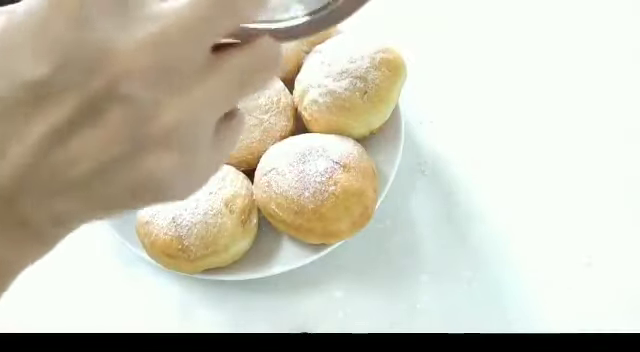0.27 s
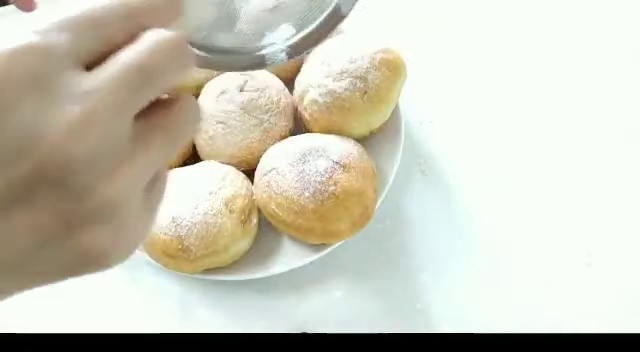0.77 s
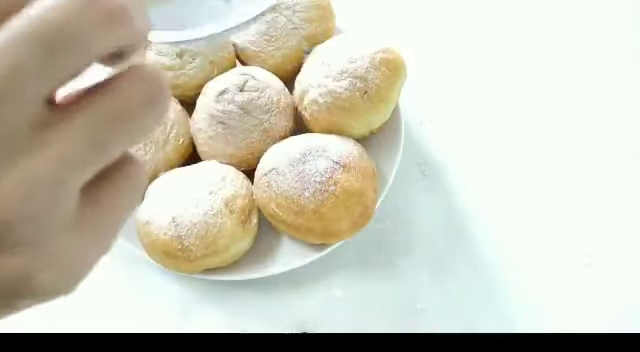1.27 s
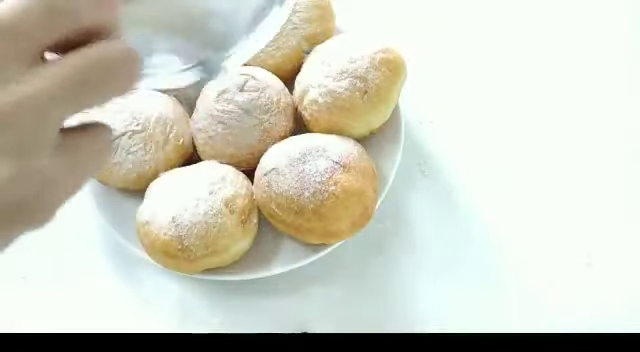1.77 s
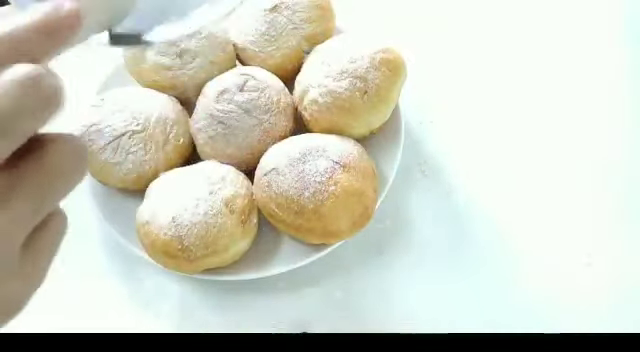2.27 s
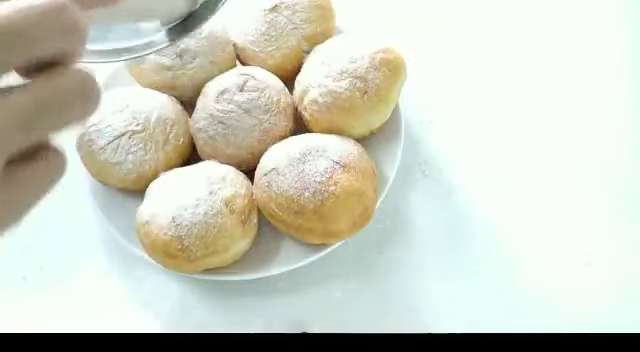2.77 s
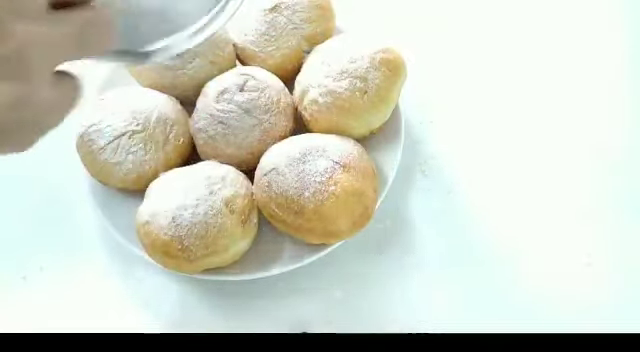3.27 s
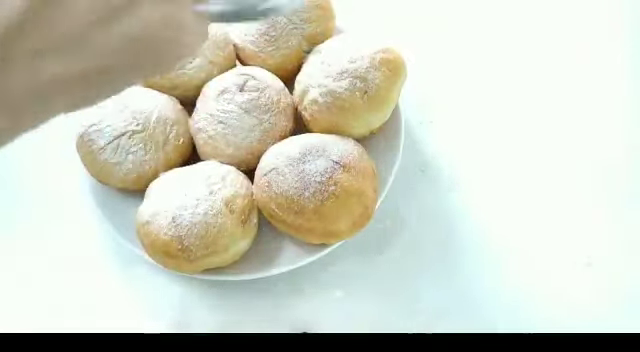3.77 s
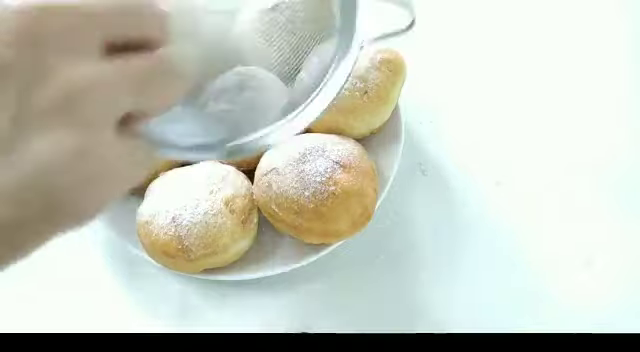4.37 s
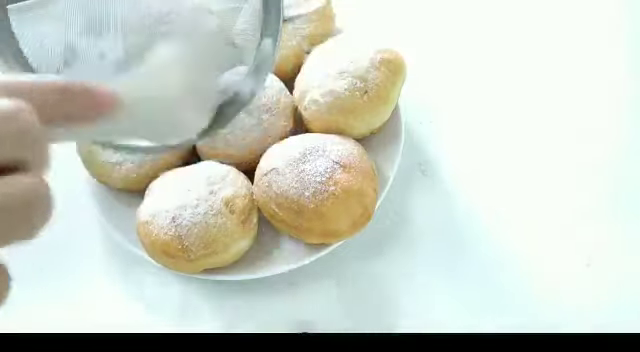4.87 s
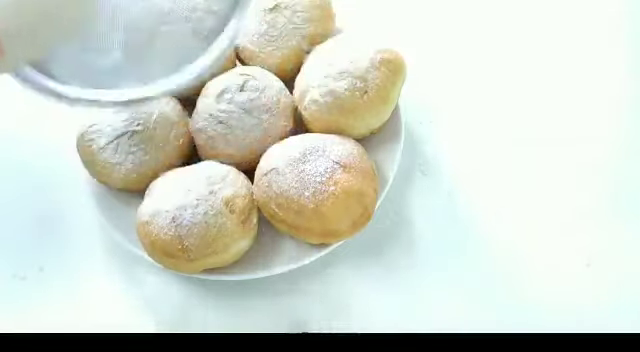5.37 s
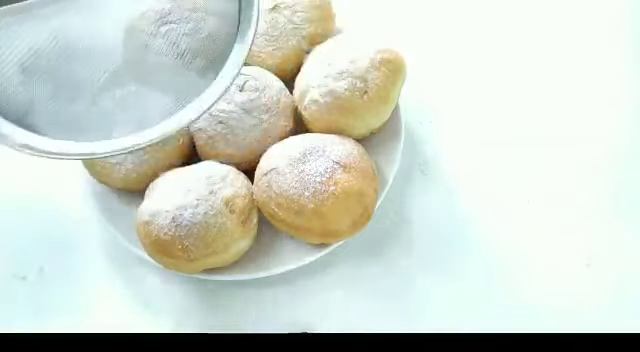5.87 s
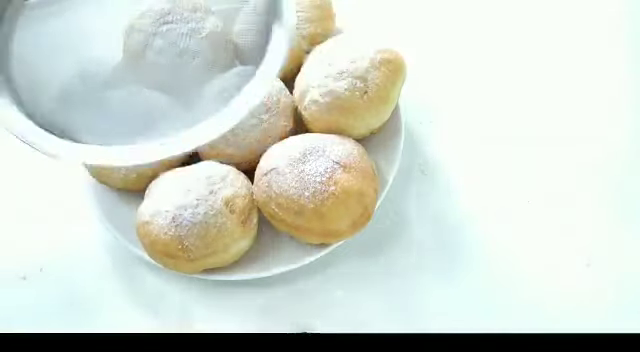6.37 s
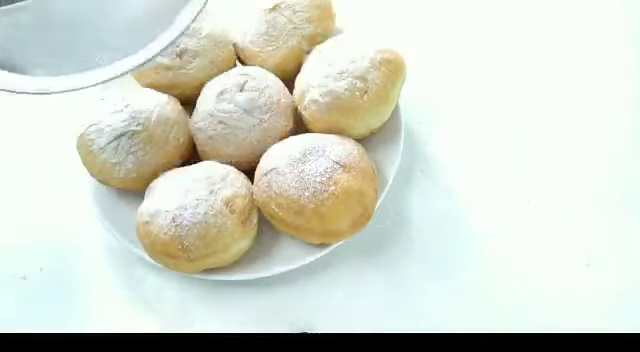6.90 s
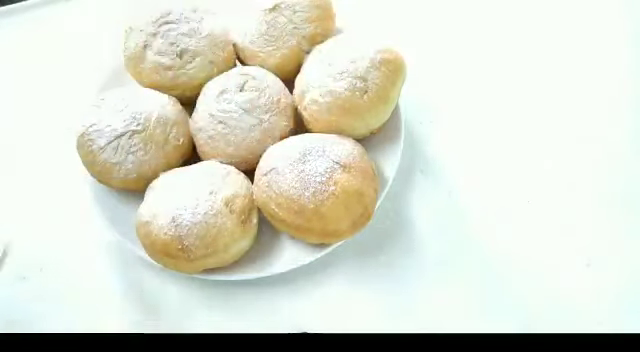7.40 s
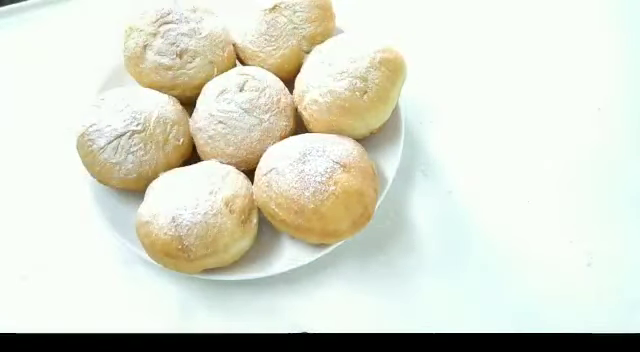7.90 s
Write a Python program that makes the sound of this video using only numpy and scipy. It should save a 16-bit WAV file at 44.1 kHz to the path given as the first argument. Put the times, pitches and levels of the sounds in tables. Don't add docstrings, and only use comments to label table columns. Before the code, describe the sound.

Fingers tap and shake a metal mesh sieve of sugar, sharp rim cracks and grainy swishes close up over a low kitchen hum.

```python
import sys
import numpy as np
from scipy import signal
from scipy.fft import rfft, irfft, next_fast_len
from scipy.io import wavfile
from scipy.ndimage import uniform_filter1d

SR = 44100
rng = np.random.default_rng(int(sys.argv[2]) if len(sys.argv) > 2 else 0)


def boost(x):
    u = np.asarray(x, float) / 20
    return 10 ** u


def store_pcm(level_fs):
    pcm = np.round(np.clip(level_fs, -1, 1) * 32767).astype(np.int16)
    wavfile.write(sys.argv[1], SR, np.atleast_2d(pcm).T)


N = 358959

# frequency in Hz, level in dB per Hz.
HUM_SPECTRUM = [(18, -65), (30, -38), (53, -39), (112, -20), (227, -1.5), (280, -6.5), (404, -1.5),
                (600, -10.5), (889, -12), (1220, -13), (1760, -15.5), (2290, -13), (5900, -24), (6720, -22),
                (16000, -29)]
# frequency in Hz, width in Hz, height in dB.
HUM_TONES = [(180, 20, 3), (365, 15, 3), (254, 14, 4.5), (416, 12, 5.5), (556.2, 13, 9.5), (595, 12, 10),
             (641, 12, 3.5), (725, 4.7, 1), (1087, 19, 5), (1206, 16, 6.5)]
# frequency in Hz, likeness left to right (1 = same).
HUM_LIKENESS = [(60, 1), (130, 0.96), (290, 0.81), (640, 0.57), (1410, -0.1), (3100, 0), (6820, 0),
                (15000, 0.1)]
# time in seconds, level in dB.
HUM_LEVEL = [(0.0, -42), (0.9, -41), (1.7, -39.3), (2.7, -36.8), (4.4, -35.6), (5.2, -37.3), (5.58, -33.5),
             (5.96, -36), (6.89, -34.8), (8.14, -35.4)]
# fastest slide in seconds, level in dB, rise in seconds.
SLIDES = [(0.018, -27.5, 0.037), (0.191, -24.5, 0.022), (0.398, -26.5, 0.024), (0.587, -28.5, 0.016),
          (0.872, -20.5, 0.0054), (1.552, -28, 0.043), (1.756, -26, 0.024), (1.945, -24, 0.026),
          (2.699, -20, 0.0098), (2.82, -23, 0.01), (2.911, -24.5, 0.003), (3.091, -19, 0.013),
          (3.294, -21.5, 0.02), (3.477, -21, 0.012), (3.59, -25, 0.005), (3.657, -22, 0.015),
          (3.753, -17, 0.0063), (3.846, -22, 0.031), (3.941, -16.5, 0.013), (4.037, -21, 0.019),
          (4.123, -17, 0.0049), (4.232, -23.5, 0.043), (4.336, -18, 0.003), (4.422, -24.5, 0.041),
          (4.632, -23, 0.014), (4.807, -25.5, 0.031), (5.013, -24.5, 0.028), (5.187, -20.5, 0.003),
          (5.212, -20, 0.012), (5.56, -31, 0.053), (5.715, -27.5, 0.018)]
# peak in seconds, level in dB, rise in
# seconds, fall in seconds.
TRICKLES = [(0.836, -30, 0.002, 0.009), (0.72, -46, 0.06, 0.1), (1.0, -47, 0.04, 0.08),
            (1.15, -45, 0.06, 0.1), (1.32, -44, 0.04, 0.06), (2.03, -41, 0.03, 0.08),
            (5.33, -41, 0.03, 0.1), (5.14, -32, 0.01, 0.04), (2.66, -36, .02, .02), (2.79, -32, .01, .02),
            (3.03, -31, .01, .02), (5.525, -30, .006, .03),  (2.217, -31.5, 0.012, 0.075),
            (2.4, -31, 0.017, 0.08), (2.57, -31, 0.025, 0.12), (4.76, -32, .01, .03), (4.95, -33, .01, .03),
            (8.06, -33, .03, .03), (3.42, -30, .01, .03), (5.94, -46, 0.016, 0.17),
            (6.6, -33, 0.022, 0.051), (7.13, -44, 0.1, 0.1), (7.336, -35.5, 0.026, 0.027),
            (7.483, -40, 0.022, 0.054), (7.655, -23, 0.025, 0.035), (7.735, -33, 0.03, 0.04),
            (7.812, -27, 0.03, 0.04), (7.9, -29, 0.05, 0.045), (8.015, -31, 0.02, 0.03),
            (8.118, -30.5, 0.05, 0.2)]
# start in seconds, crack peak in dB, dull part in dB, thrown sugar in dB.
TAPS = [(0.1335, -14, -5, -33), (0.3087, -13, -24, -20), (0.37, -14, -16, -22), (0.5148, -12, 5, -32),
        (0.5696, -8, -20, -21), (0.859, -12, -19, -24), (1.4486, -3, -18, -26.5), (1.6632, -3.5, 6, -26),
        (1.7252, -13, -18, -27), (1.8688, -4, -26, -22), (2.1951, -2, -18, -22), (2.1972, -4, -20, -24),
        (2.3597, -1, -27, -22), (2.5247, -3, -26, -23), (2.8964, -9, -14, -19.5), (3.0074, -11, -22, -19.5),
        (3.1993, -19, -28, -17.5), (3.392, -11, -10, -17.5), (3.579, -4, -26, -21), (3.591, -7, -20, -24),
        (3.732, -13, -18.5, -23), (4.3242, -8, -24, -19), (4.3337, -4, -22, -25), (4.5472, -10, -30, -24),
        (4.6123, -9, -23, -21.5), (4.6159, -2.5, -18, -26), (4.734, 0, -12, -23), (4.7885, -10, -22, -25),
        (4.9233, 0, -28, -25), (4.9868, -11, -29, -26), (5.1136, -2.5, -9, -22), (5.5075, -1.5, -24, -22),
        (5.5105, -4, -22, -26), (5.671, -2.5, -25, -24), (5.673, -6, -26, -28), (8.035, -12, -7, -27.5)]
# frequency in Hz, level in dB per Hz.
SUGAR_SPECTRUM = [(500, -39), (1000, -10), (1700, -13.5), (2500, -6.5), (3300, -5.5), (4200, -6),
                  (6000, -6.5), (6750, -8), (7200, -5.5), (8500, -4), (12000, -3), (15000, 0), (16500, -22)]
# frequency in Hz, width in Hz, height in dB.
MESH_MODES = [(2170, 340, 4.5), (3730, 130, 1.5), (4710, 100, -1), (5980, 470, 6), (7405, 390, 5),
              (8444, 350, 9), (9940, 1240, 5.5), (11680, 880, 5.5), (13200, 270, -0.5), (3240, 130, -1.5),
              (9000, 170, 0)]
# frequency in Hz, level in dB, T60 in seconds.
HOOP_MODES = [(1070, -6, .03), (1450, -3, .012), (2270, 2, .022), (3740, 0, .008), (4770, -1, .012)]
# time in seconds, left minus right in dB.
SIEVE_PAN = [(0, -2.2), (1.9, -2.1), (2.2, -0.4), (2.6, -3), (3.3, -0.8), (4.1, -3), (4.85, 0.8),
             (5.3, -0.8), (8.14, -1.6)]
# centre in seconds, half length in seconds, frequency in Hz, level in dB.
DRONES = [
    (1.03, .1, 183, -47),
    (1.04, .12, 258, -44),
    (1.54, .13, 182, -45),
    (1.62, .22, 250, -43),
    (1.5, .13, 367, -44),
    (1.62, .1, 345, -47),
    (2.03, .17, 365, -44),
    (2.02, .15, 210, -46),
]
# start in seconds, depth in dB.
DIPS = [
    (2.194, 7.5),
    (2.359, 15),
    (2.523, 12),
    (4.733, 11),
    (4.923, 6),
    (5.113, 4),
    (5.507, 13),
    (5.670, 9),
]
# frequency in Hz, level in dB, T60 in seconds.
RIM_MODES = [(4800, -43, 0.22), (5950, -40, .3), (7440, -30.5, 0.6), (7730, -36, 0.4), (8370, -38, 0.3),
             (10200, -36, 0.4), (11710, -29, .5), (12880, -38, .3), (14690, -39, .3)]
# start in seconds, peak in dB, frequency in Hz.
KNOCKS = [
    (3.48, -35, 1270),
    (3.666, -34, 997),
    (3.836, -30, 1154),
    (3.957, -44, 1010),
    (4.021, -33, 997),
]
# frequency in Hz, left minus right in dB.
PORT_COLOUR = [(60, 0), (120, -2), (250, 1), (500, 0.5), (2000, 0), (4400, -0.4), (8000, -2), (15000, 3.5)]
# frequency in Hz, width in Hz, height in dB.
CASE_NOTCHES = [(6750, 300, -3), (9150, 250, -2), (11000, 300, -2)]


def interp_log(hz, points):
    points = np.array(points)
    return np.interp(np.log(hz), np.log(points[:, 0]), points[:, 1])


def gain(points, peaks, size):
    hz = np.arange(size // 2 + 1) * SR / size + 1
    db = interp_log(hz, points)
    db = db + sum(up / (1 + (2 * (hz - f) / width) ** 2) for f, width, up in peaks)
    cepstrum = irfft(np.log(boost(db)), size)
    cepstrum[1:size // 2] *= 2
    cepstrum[size // 2 + 1:] = 0
    return irfft(np.exp(rfft(cepstrum)), size)[:size // 2]


def through(x, response):
    return signal.oaconvolve(x, np.atleast_2d(response), axes=1)[:, :x.shape[1]]


def split(x):
    edge_hz = 4580
    low = signal.sosfilt(signal.butter(2, edge_hz, "low", fs=SR, output="sos"), x)
    high = signal.sosfilt(signal.butter(2, edge_hz, "high", fs=SR, output="sos"), x)
    return low, -high


def unit(x):
    return x / np.sqrt(np.mean(x ** 2))


def walk(rate_hz):
    hold = int(SR / rate_hz)
    steps = np.repeat(rng.standard_normal(N // hold + 1), hold)
    return 1.3 * uniform_filter1d(uniform_filter1d(steps, hold), hold)[:N]


def patchy(x, depth_db, long, size):
    z = signal.stft(x, nperseg=size)[2]
    field = rng.standard_normal(z.shape)
    field = uniform_filter1d(field + field[0], 2, axis=1)
    field = uniform_filter1d(field, long, axis=2)
    return unit(signal.istft(z * boost(depth_db * unit(field)), nperseg=size)[1][:, :N])


def sides(pan_db):
    return boost(np.array([[pan_db], [-pan_db]]) / 2)


def place(s):
    return np.interp(s, *np.transpose(SIEVE_PAN))


def dip_db(t):
    close_s, open_s = 0.011, 0.036
    total_db = 0
    for s, depth_db in DIPS:
        since = np.clip(t - s, 0, 2)
        total_db = total_db - 3.03 * depth_db * (np.exp(-since / open_s) - np.exp(-since / close_s))
    return total_db


def hum(t):
    size = next_fast_len(N)
    hz = np.arange(size // 2 + 1) * SR / size + 1
    alike = interp_log(hz, HUM_LIKENESS).clip(-.9, .99)
    mid = irfft(rfft(rng.standard_normal(N), size) * np.sqrt(1 + alike), size)[:N]
    side = irfft(rfft(rng.standard_normal(N), size) * np.sqrt(1 - alike), size)[:N]
    air = unit(through(np.array([mid + side, mid - side]), gain(HUM_SPECTRUM, HUM_TONES, size=16384)))
    air = patchy(air, depth_db=2.0, long=9, size=4096)
    level_db = np.interp(t, *np.transpose(HUM_LEVEL)) + 0.35 * walk(6.8)
    return air * boost(level_db + dip_db(t) + 3.5)


def hiss():
    shape = [(1500, -10), (4000, -10.5), (8000, 2), (16000, -7)]  # Hz, dB
    air = through(rng.standard_normal((2, N)), gain(shape, [], size=1024))
    return patchy(air, depth_db=3.5, long=4, size=1024) * boost(-49.3)


def grains(per_s, spread_db, smear_s):
    sizes = (rng.random(N) < per_s / SR) * boost(spread_db * rng.exponential(size=N))
    tail = np.exp(-np.arange(128) / (smear_s * SR))
    power = through(sizes[None] ** 2, tail).clip(0)
    return unit(np.sqrt(power) * rng.standard_normal((2, N)))


def sugar_power(t):
    bright, dull = np.zeros((2, N)), np.zeros((2, N))
    strokes = [(s, db, rise_s, 0.023 + 0.3 * rise_s) for s, db, rise_s in SLIDES]
    for s, db, rise_s, fall_s in strokes + TRICKLES:
        near = slice(max(int((s - 6 * rise_s) * SR), 0), int((s + 6 * fall_s) * SR))
        u = np.clip((t[near] - s) / np.where(t[near] < s, rise_s, fall_s), -20, 20)
        power = (boost(db) * sides(place(s)) / np.cosh(u)) ** 2
        dull_db = -0.9 - 0.6 * (db + 25)
        bright[:, near] += power
        dull[:, near] += power * boost(2 * dull_db)
    for s, crack_db, _, db in TAPS:
        after = slice(int(s * SR), int((s + .15) * SR))
        fall_s = max(0.012 - 0.0003 * crack_db, .005)
        power = (boost(db) * sides(place(s)) * np.exp(-(t[after] - s) / fall_s)) ** 2
        bright[:, after] += power
        dull[:, after] += power * boost(2 * -2.5)
    return bright, dull


def sugar(t):
    bright, dull = sugar_power(t)
    spray = grains(per_s=6000, spread_db=1.6, smear_s=0.00045)
    spray = unit(through(spray, gain(SUGAR_SPECTRUM, MESH_MODES, size=4096)))
    spray = patchy(spray, depth_db=4.0, long=6, size=1024)
    low, high = split(spray * boost(0.65 * walk(70)))
    thin_db = sum(-0.5 * db * (t > s) * np.exp(-abs(t - s) / 0.2) for s, db in DIPS)
    low_gain = boost(0.45 * dip_db(t) + thin_db)
    return boost(1.1) * (np.sqrt(dull) * low * low_gain + np.sqrt(bright) * high)


def rim_taps():
    out, t = np.zeros((2, N + 1024)), np.arange(1024) / SR
    shape = [(500, -36.5), (1500, 8.5), (3000, 12), (12000, 15), (16000, 4)]  # Hz, dB
    blow, ring = gain(shape, [], size=2048), gain(shape, MESH_MODES[:9], size=1024)
    chance = rng.standard_normal((len(TAPS), 3, 1024))
    for (s, db, dull_db, _), (both, left, right) in zip(TAPS, chance):
        rattle = (.6 * both + np.array([left, right])) * np.exp(-t / .003)
        rattle = unit(through(rattle, ring)) + .75 * np.sign(both[0]) * unit(blow)
        low, high = split(rattle)
        body = 0
        for k, (hz, mode_db, t60_s) in enumerate(HOOP_MODES):
            envelope = boost(mode_db + 2.2 * left[k] - 60 * t / t60_s) * (1 - np.exp(-t / .0004))
            body = body + envelope * np.sin(2 * np.pi * hz * (1 + .025 * both[k + 1]) * t)
        crack = boost(dull_db + 14) * (low + body) + high
        crack = crack / np.max(np.abs(crack.mean(axis=0)))
        i = int((s - .0004) * SR)
        out[:, i:i + 1024] += boost(db - 3.1) * sides(2.2 * place(s)) * crack
    return out[:, :N]


def drones(t):
    out = 0
    for s, long_s, hz, db in DRONES:
        out = out + boost(db) * np.exp(-((t - s) / long_s) ** 4) * np.sin(2 * np.pi * hz * t)
    return out


def rim_ring():
    out, t = np.zeros((2, N)), np.arange(SR // 2) / SR
    hz, db, t60_s = np.transpose(RIM_MODES)[:, :, None]
    chance = rng.standard_normal((len(DIPS), 2, 4, len(RIM_MODES), 2))
    for (s, depth_db), draw in zip(DIPS, chance):
        turns = hz * (1 + 0.008 * draw[..., :1]) * t + draw[..., 1:]
        modes = boost(db + .3 * depth_db - 8 - 60 * t / t60_s) * np.sin(2 * np.pi * turns)
        i = int(s * SR)
        out[:, i:i + len(t)] += modes.sum(axis=(1, 2))
    return out


def knocks(t):
    out, rough = 0, 1 + 1.1 * walk(300)
    for s, db, hz in KNOCKS:
        since = np.clip(t - s, 0, 1)
        turns = hz * (.85 * since + 0.256 * .015 * (1 - np.exp(-since / 0.0145)))
        envelope = (1 - np.exp(-since / 0.0027)) * np.exp(-since / 0.017)
        out = out + boost(db - 1.5) * envelope * np.sin(2 * np.pi * turns)
    return out * rough


def room(x):
    t60_s, level_db = 0.3, -11
    late = np.arange(SR // 2) / SR
    tail = rng.standard_normal((2, len(late))) * boost(-60 * late / t60_s) * (late > .004)
    tail = boost(level_db) * tail / np.sqrt(np.sum(tail ** 2) / 2)
    return through(x, tail)


def scene():
    t = np.arange(N) / SR
    sieve = sugar(t) + rim_taps() + knocks(t)
    return hum(t) + hiss() + sieve + room(sieve) + drones(t) + rim_ring()


def masked(x):
    from_hz, attack_db, depth_db = 2800, 5, -40
    hz, _, z = signal.stft(x, SR, nperseg=1024)

    def smooth(v):
        return uniform_filter1d(uniform_filter1d(v, size=5, axis=0), size=4, axis=1)

    band = smooth((np.abs(z) ** 2).mean(axis=0))
    total = band.mean(axis=0)
    under_db = -6.4 + 1.7 * np.exp(-((hz[:, None] - 4200) / 1500) ** 2)
    under_db = under_db + 3.4 * unit(smooth(rng.standard_normal(band.shape)))
    under_db = under_db + 0.12 * 10 * np.log10(total / np.median(total) + 1e-9)
    weak = band < boost(2 * under_db) * uniform_filter1d(band, size=48, axis=0)
    weak = weak & (hz[:, None] > from_hz)
    bright = (np.abs(z[:, hz > from_hz]) ** 2).sum(axis=(0, 1))
    weak = weak & (np.roll(bright, -1) < boost(2 * attack_db) * np.roll(bright, 1))
    weak = uniform_filter1d(1. * weak, size=5, axis=0) > .1
    return signal.istft(z * np.where(weak, boost(depth_db), 1), nperseg=1024)[1][:, :N]


def hushed(x):
    hush_s, hush_db, from_hz, blow_over_db = 0.014, -2.5, 3500, -10
    size, out = int(hush_s * SR), x.copy()
    ramp = np.arange(size)
    fade = np.minimum(ramp / 200, 1) * np.minimum(ramp[::-1] / 30, 1)
    blows = np.array(TAPS)[:, :2]
    alone = np.diff(blows[:, 0], prepend=0) > 2 * hush_s
    for s, _ in blows[alone & (blows[:, 1] > blow_over_db)]:
        i = int((s - .001) * SR)
        hz, _, z = signal.stft(x[:, i - size:i], SR, nperseg=128)
        holes = uniform_filter1d(rng.standard_normal(z.shape[1:]), size=4, axis=0)
        holes = unit(holes[:, ::4]).repeat(4, axis=1)[:, :z.shape[2]]
        lost = np.where(holes > 0.8, 1, 1 - boost(hush_db)) * (hz[:, None] > from_hz)
        out[:, i - size:i] -= fade * signal.istft(z * lost, nperseg=128)[1][:, :size]
    return out


def band_limit(x):
    return signal.sosfilt(signal.butter(12, 19000, fs=SR, output="sos"), x)


def record(dry):
    left = gain([(hz, db / 2) for hz, db in PORT_COLOUR], CASE_NOTCHES, size=1024)
    right = gain([(hz, -db / 2) for hz, db in PORT_COLOUR], CASE_NOTCHES, size=1024)
    thinned = hushed(masked(through(dry, [left, right])))
    dim = signal.sosfilt(signal.ellip(8, .2, 38, 15520, fs=SR, output="sos"), thinned)
    cut = signal.sosfilt(signal.ellip(10, .2, 60, 16700, fs=SR, output="sos"), dim)
    return band_limit(cut)


dry = scene()
out = record(dry)
store_pcm(out)
```